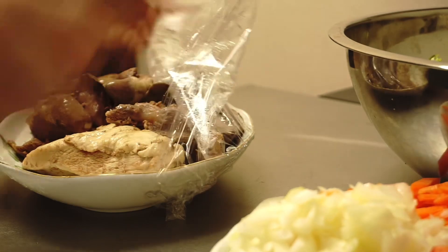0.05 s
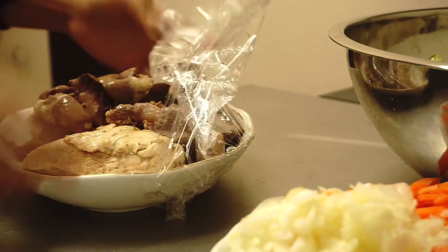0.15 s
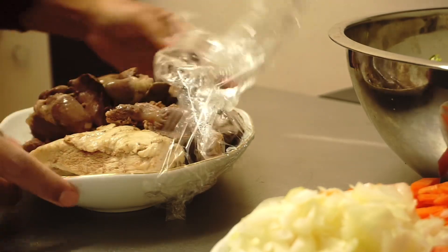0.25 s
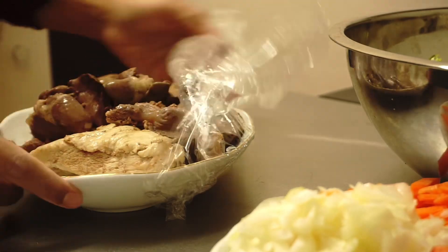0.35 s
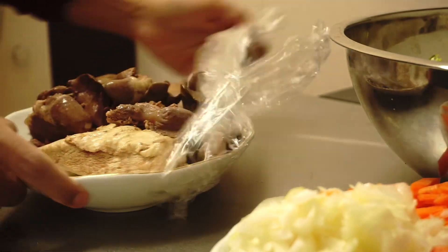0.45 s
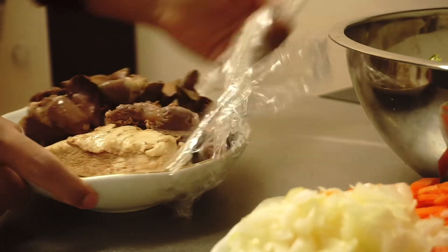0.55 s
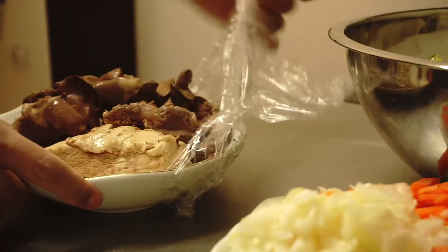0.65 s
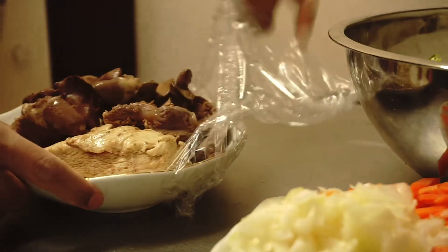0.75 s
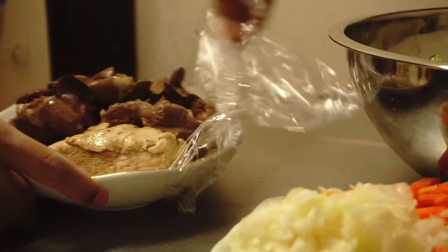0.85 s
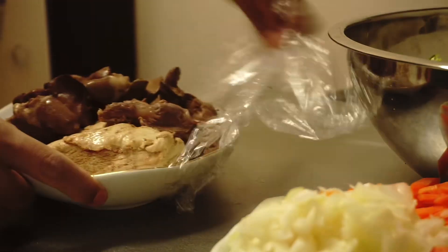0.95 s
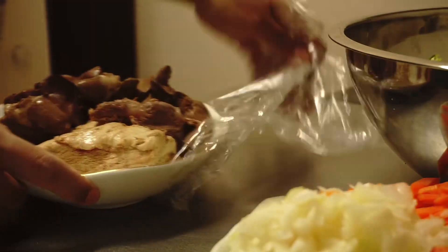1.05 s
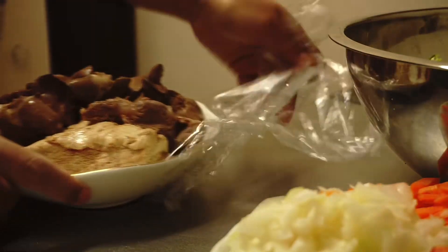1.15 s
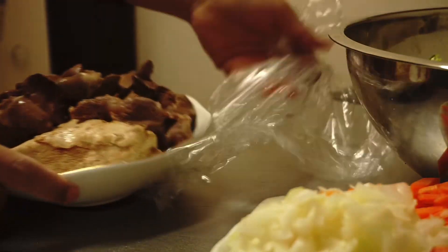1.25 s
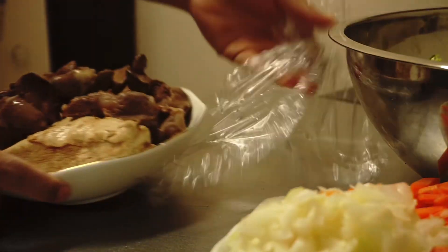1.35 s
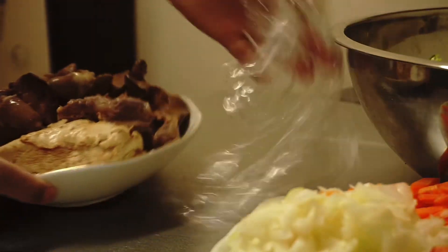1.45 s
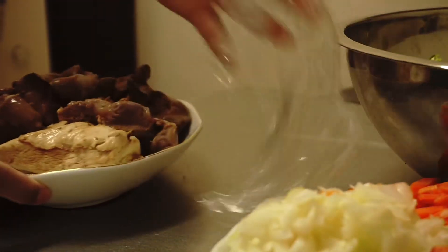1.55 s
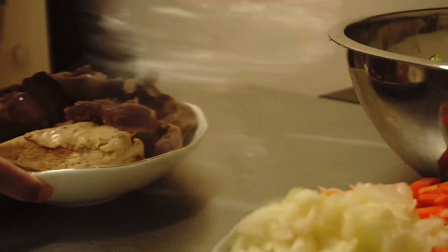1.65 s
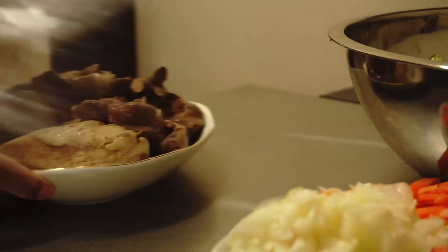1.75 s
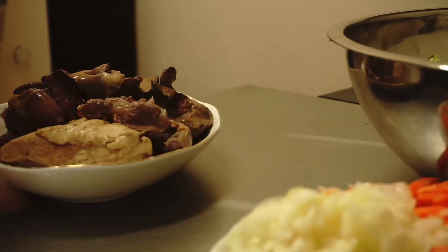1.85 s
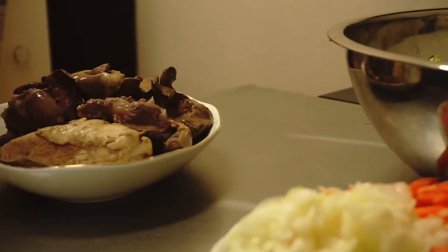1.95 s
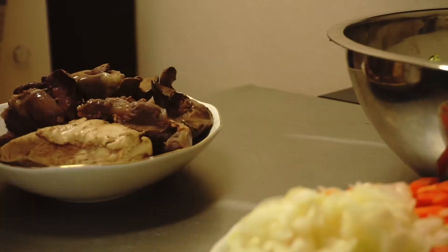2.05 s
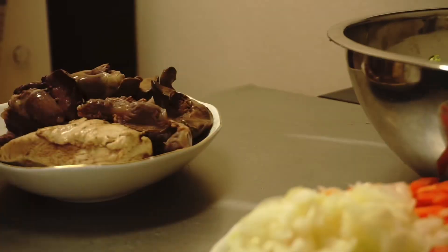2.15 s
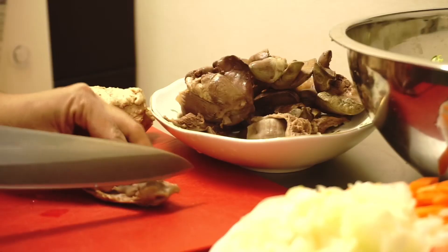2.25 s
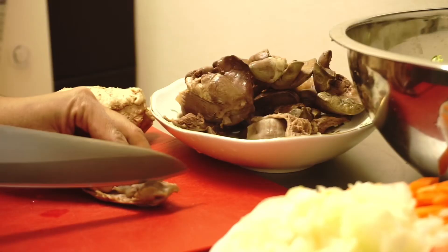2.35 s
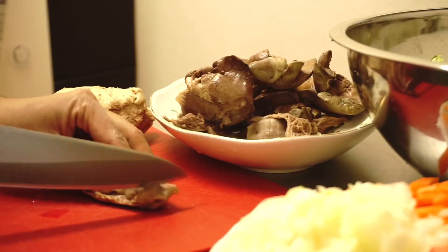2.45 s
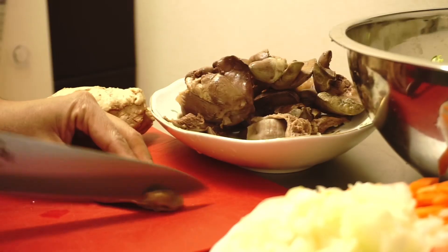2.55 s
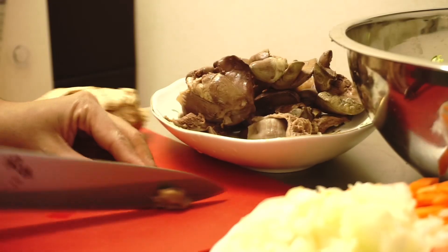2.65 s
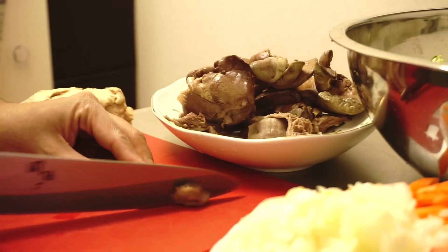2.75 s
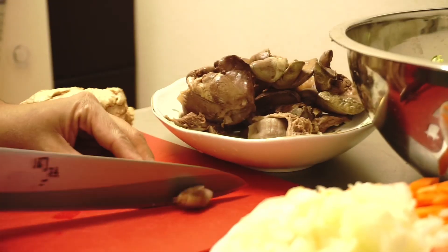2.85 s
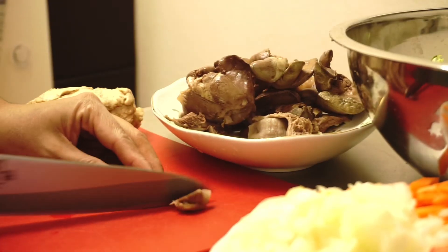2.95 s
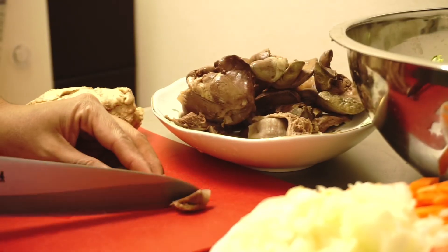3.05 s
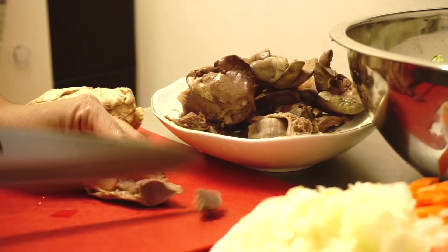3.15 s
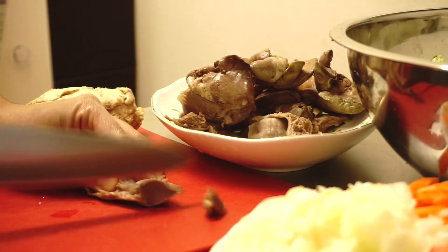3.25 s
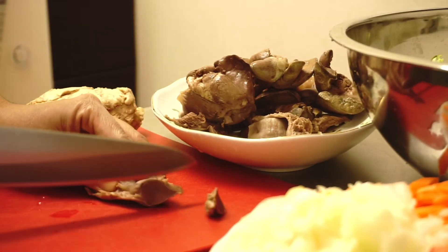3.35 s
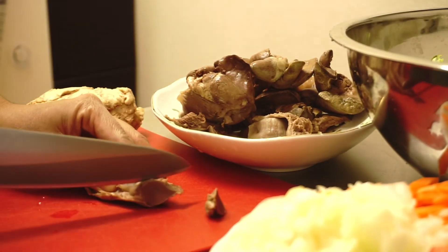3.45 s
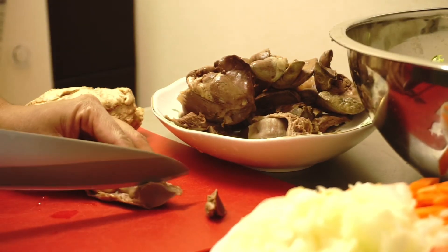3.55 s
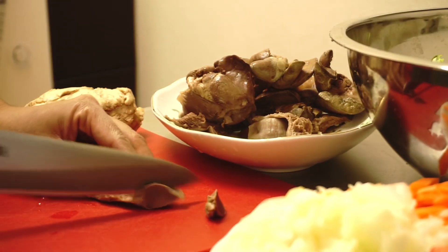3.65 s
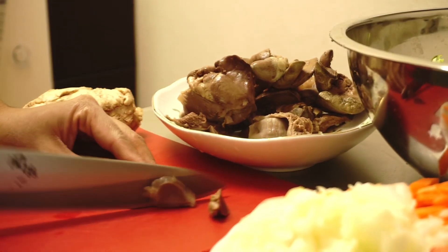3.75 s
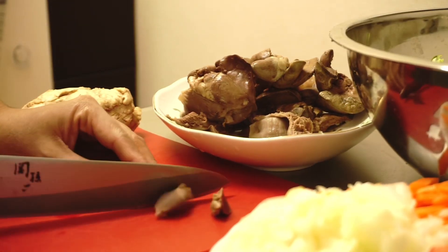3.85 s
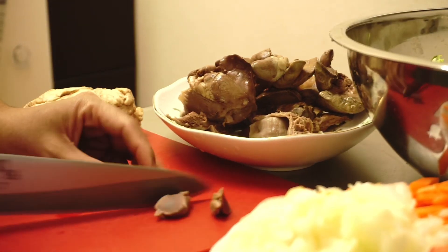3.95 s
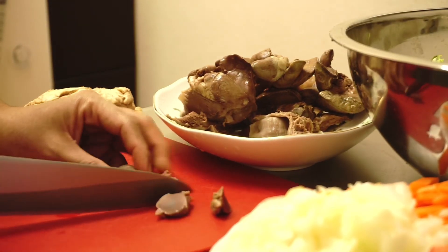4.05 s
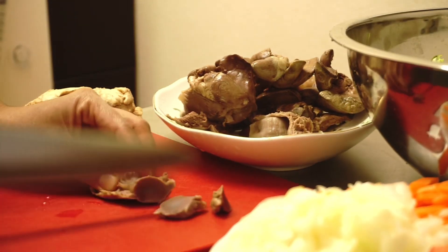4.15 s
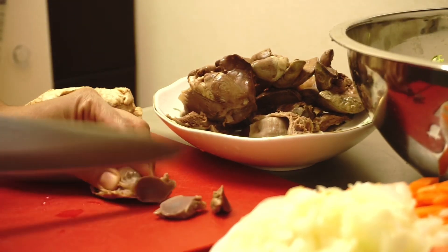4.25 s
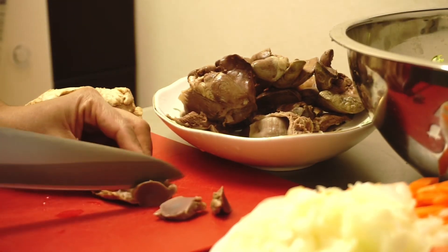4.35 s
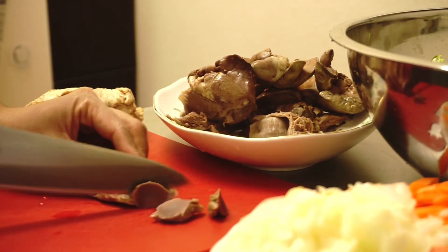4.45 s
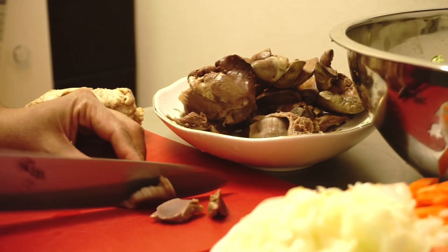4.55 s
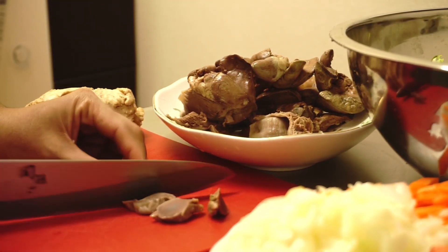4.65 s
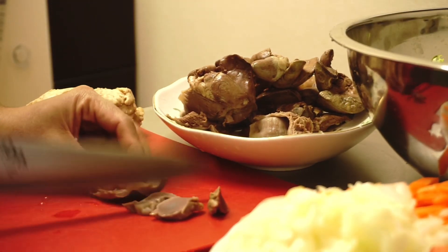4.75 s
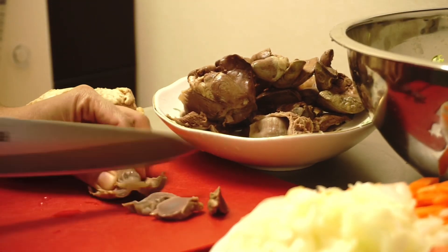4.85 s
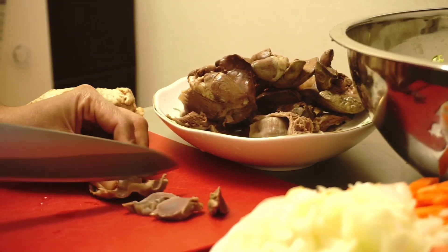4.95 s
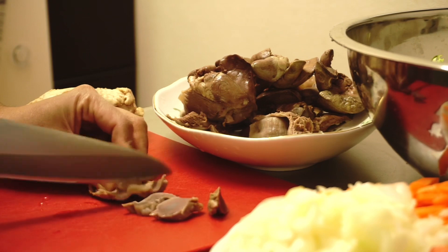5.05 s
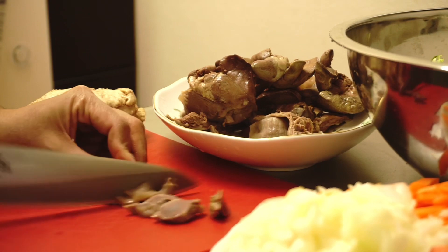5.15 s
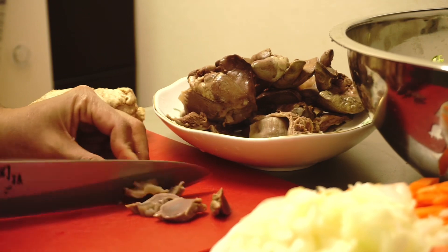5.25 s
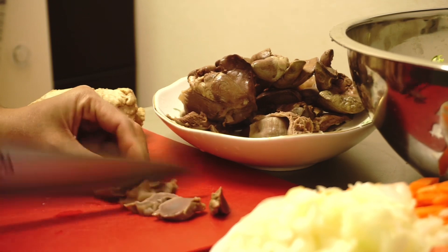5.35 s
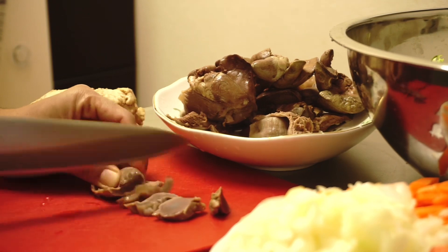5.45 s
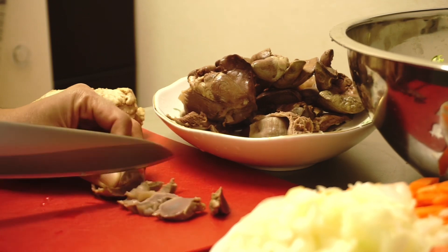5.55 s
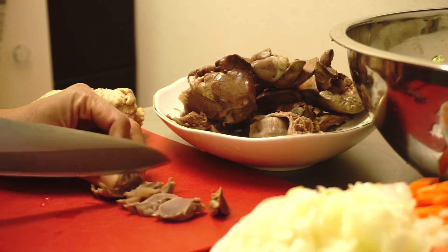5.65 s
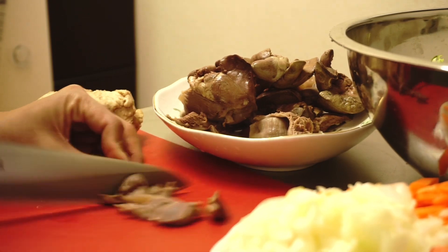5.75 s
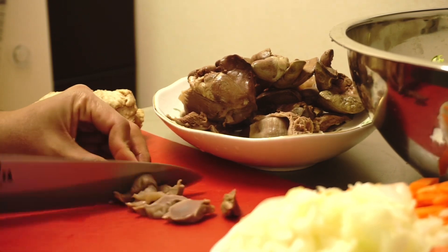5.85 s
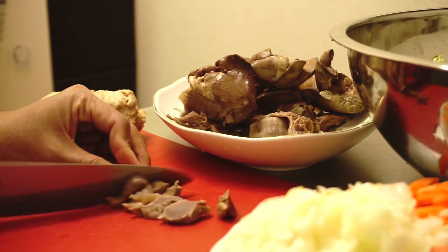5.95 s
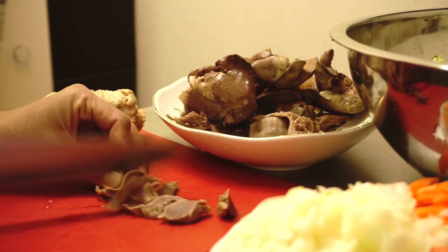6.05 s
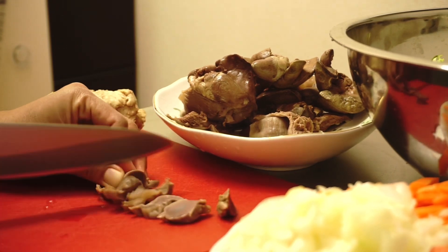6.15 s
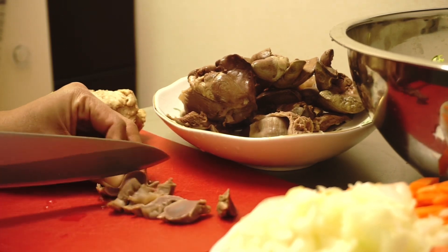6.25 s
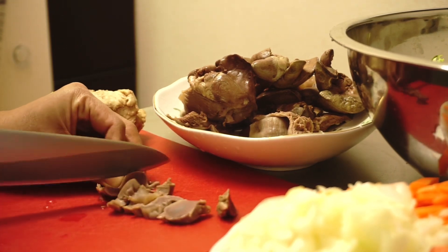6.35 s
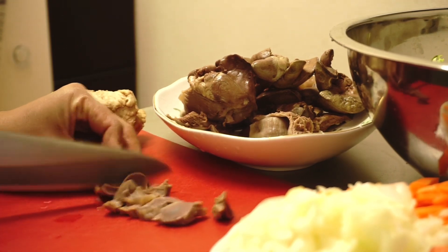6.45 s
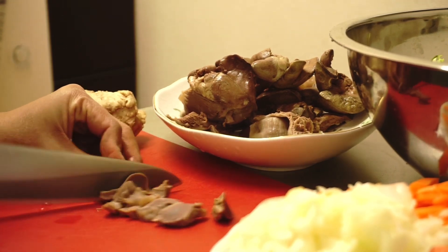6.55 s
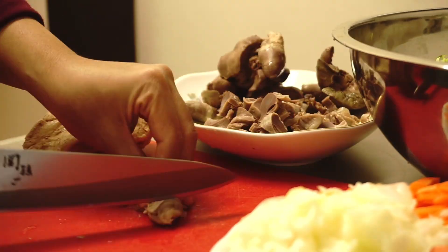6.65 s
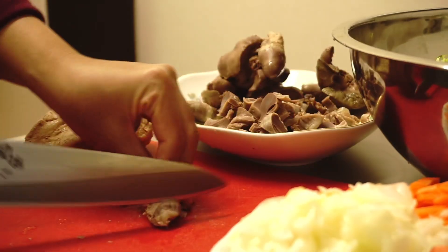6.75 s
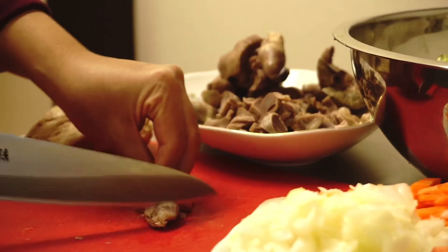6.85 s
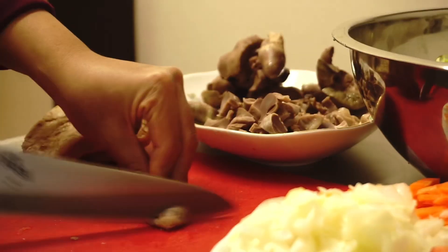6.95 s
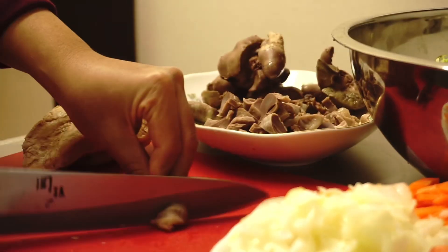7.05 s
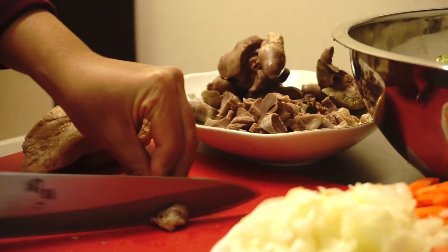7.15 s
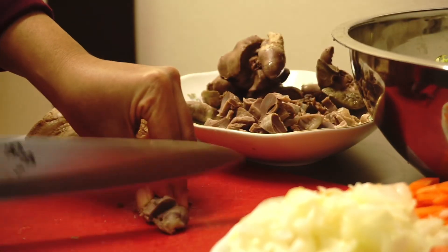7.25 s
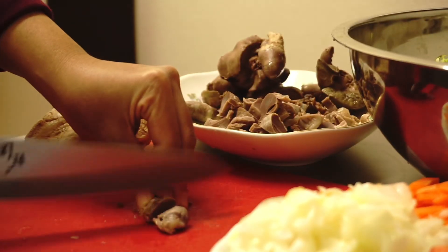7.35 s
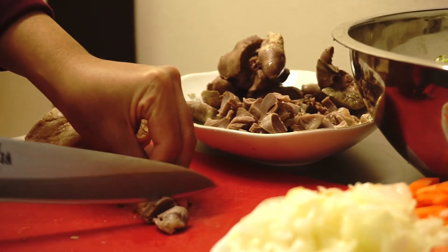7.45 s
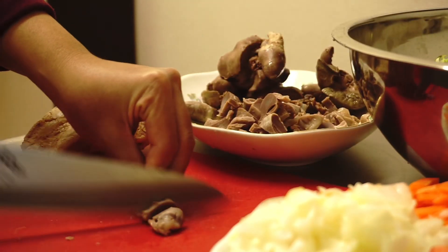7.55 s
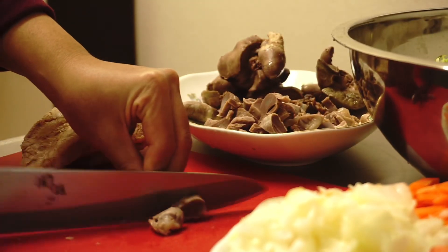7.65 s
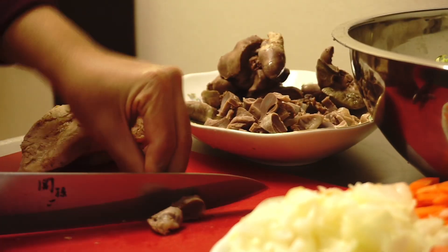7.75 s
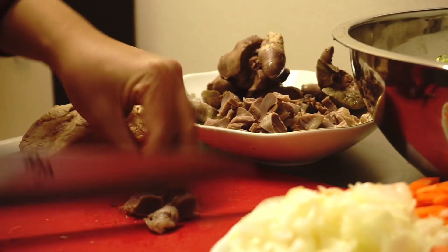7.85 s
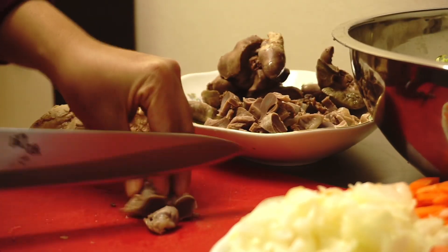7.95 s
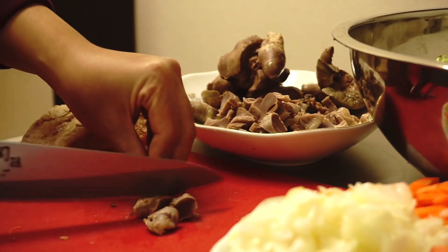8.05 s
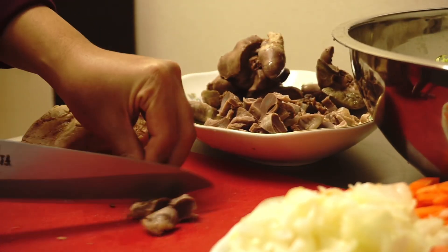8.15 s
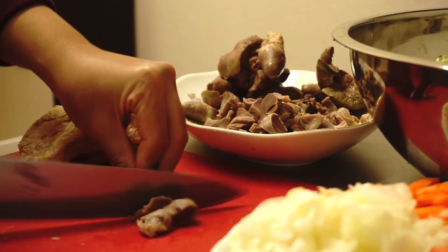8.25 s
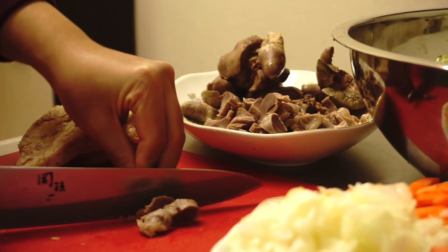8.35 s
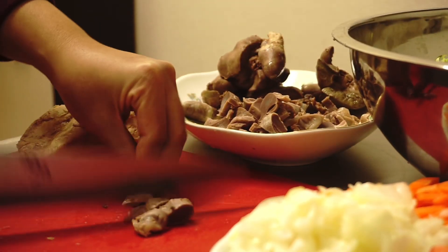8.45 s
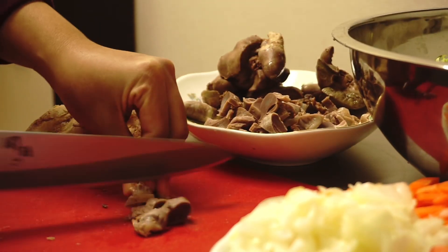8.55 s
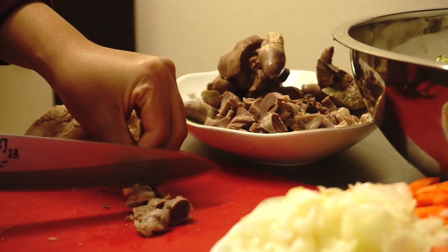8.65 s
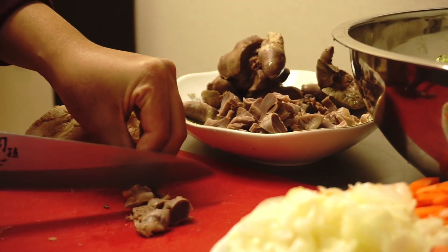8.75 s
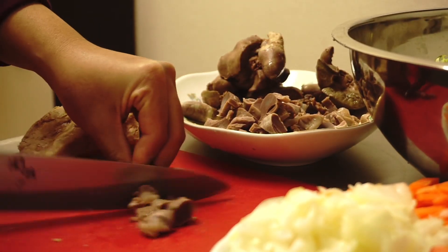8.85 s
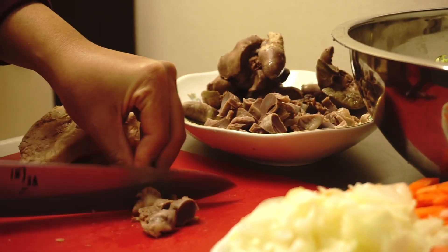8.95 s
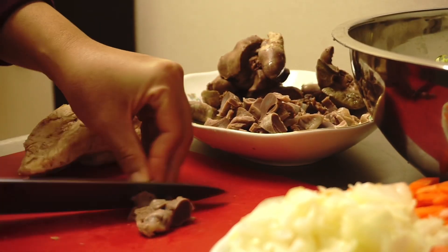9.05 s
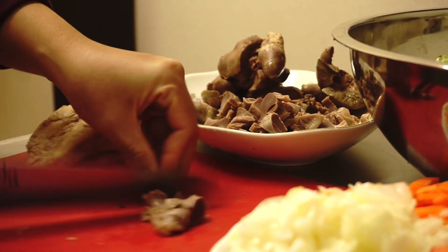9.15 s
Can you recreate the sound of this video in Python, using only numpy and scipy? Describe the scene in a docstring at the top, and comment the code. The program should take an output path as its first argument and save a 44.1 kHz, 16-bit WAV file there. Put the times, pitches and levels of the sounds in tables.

```python
"""A large knife slices cooked meat: each cut lands on a plastic board, which shakes the counter.
The landings are short pushes, filtered clacks and decaying modes; the dragged blade ticks and sings.
Before that, cling film is peeled off a china bowl and crumpled as filtered random clicks; the china rings,
the bowl bumps the counter, and the film stops dead at an edit. A small, live kitchen with a faint hum."""
import sys
import numpy as np
from scipy import signal
from scipy.fft import rfft, irfft, next_fast_len
from scipy.io import wavfile
from scipy.ndimage import uniform_filter1d

SR = 44100
rng = np.random.default_rng(int(sys.argv[2]) if len(sys.argv) > 2 else 0)


def output_pcm(signal):
    """Save a mono or channel-first signal as 16-bit PCM at the path in sys.argv[1].

    Samples are clipped to [-1, 1] before scaling.
    """
    pcm = np.clip(np.atleast_2d(signal).T, -1, 1) * 32767
    wavfile.write(sys.argv[1], SR, np.round(pcm).astype(np.int16))


N = 405260
T = np.arange(N) / SR
TAIL = T[:SR // 2]  # time axis of every ring and echo
EDIT_S, TOP_HZ = 2.249, 11170

# Blows: first the bowl on the counter, then the knife on the board. Each row: time in seconds, force in dB,
# cushioning by meat 0-1, weight on the edge 0-1, hiss of slicing in dB.
BLOWS = [(1.631, -29, 0.3, 0.87, -70), (2.557, -46, .55, 0.2, -75), (2.628, -35, 0.37, 0, -48.5),
         (2.9, -42, .65, 1, -48), (3.705, -34.5, 0.54, 0.44, -57.5), (3.942, -36, 0.88, 0.89, -50),
         (4.468, -24.5, 0.36, 0.07, -57.5), (5.105, -25.5, .2, 0, -57.5), (5.729, -24.5, 0.36, 0.43, -55),
         (5.795, -35.5, .7, 0.99, -74), (6.541, -40, 0.8, 0.14, -57.5), (6.92, -33.5, 0.48, 0.79, -55),
         (7.54, -25.5, 0.48, 0.33, -59), (8.202, -25, .02, 0.31, -59.5), (8.809, -37, 0.88, 0.52, -69),
         (8.98, -35.5, 1, 0, -57)]
# Low modes of the board, woken by every blow. Each row: frequency in Hz, level in dB, T60 in seconds.
BOARD_MODES = [(332.6, -1, 0.38), (360, 1, 0.43), (366, 4, 0.19), (430, 5, 0.32), (432, -30, 0.094),
               (517.4, 3.5, 0.28), (558.8, 2.5, 0.21), (591, -11, 0.47), (714, -31, 0.15)]
# Upper modes of the board, weaker on cushioned landings. Each row: frequency in Hz, level in dB, T60 in seconds.
BOARD_TOP_MODES = [(901, -6, 0.46), (1040, -5.5, 0.63), (1257, -14, 0.47), (1237, -8.5, 0.64),
                   (1316, 0.5, 0.3), (1598, -14.5, 0.49), (1673, -6.5, 0.22), (1900, -15, 0.12),
                   (2280, -7, 0.14)]
# Modes of the counter. Each row: frequency in Hz, level in dB, T60 in seconds.
COUNTER_MODES = [(122.6, -14.5, 0.81), (150, -13, 0.71), (183, -30, 0.18), (224.8, 3.5, 0.3),
                 (242, 7, 0.54), (280, 1, 0.57)]
# Spectrum of the edge's clack. Each row: frequency in Hz, relative level in dB.
CLACK_COLOUR = [(300, -26), (650, -10), (1050, 1), (1350, 0.5), (1700, 1.5), (2100, -8), (2500, -6.5),
                (3200, -11.5), (4500, -21.5), (9000, -28)]
# Spectrum of crushed fibres. Each row: frequency in Hz, relative level in dB.
CRUNCH_COLOUR = [(400, -22.5), (1500, 7.5), (3000, 10.5), (4500, 4), (7000, 0), (11000, 3.5)]
# Blade dragged clear over the board. Each row: peak in seconds, level in dB, length in seconds,
# pitch of the steel in Hz.
DRAGS = [(2.92, -71, 0.032, 2780), (3.015, -37, 0.025, 2830), (3.043, -35.5, 0.038, 3050),
         (4.057, -33, 0.025, 2063), (4.689, -38.5, 0.034, 2384), (5.306, -37, 0.027, 2024),
         (5.947, -39.5, 0.039, 2400), (7.124, -48.5, 0.054, 2260), (8.141, -58.5, 0.043, 2320),
         (8.383, -49, .04, 2300), (9.084, -45.5, .05, 2310)]
# Spectrum of the scraping edge. Each row: frequency in Hz, relative level in dB.
DRAG_COLOUR = [(60, -48), (200, -9), (600, 4), (1200, 0), (1900, 4), (2500, 5.5), (2900, 8), (3400, 2),
               (4500, 0.5), (7000, -3.5), (11000, -0.5)]
# Modes of the blade. Each row: ratio to the pitch of the steel, level in dB, T60 in seconds.
BLADE_MODES = [(1.001, -2, 0.26), (1.012, -19, 0.66), (1.049, -7, 0.23), (1.376, 1, 0.082),
               (1.439, -0.5, 0.067), (1.59, -5, 0.12), (2.44, -12, 0.13), (3.35, -29, .1)]
# Light knock of the knife. Each row: frequency in Hz, level in dB, T60 in seconds.
TAP_MODES = [(587, 0, 0.032), (806, -4, .03), (987, 5.5, 0.025), (1230, -2, 0.023), (1460, 2.5, 0.023),
             (1770, -2, .02), (2140, -1, 0.027), (2460, 1.5, 0.02), (3560, -8, .015)]
# Pulling and crumpling of the film. Each row: time in seconds, crackle level in dB before FILM_GAIN_DB.
FILM_EFFORT = [(0.0, -42.5), (0.14, -55), (0.31, -34.5), (0.39, -41), (0.5, -27), (0.54, -38),
               (0.76, -40.5), (0.79, -37.5), (0.84, -38.5), (0.91, -25), (1.06, -46.5), (1.12, -35.5),
               (1.31, -41.5), (1.4, -36), (1.44, -38.5), (1.46, -29), (1.58, -45), (1.64, -35.5),
               (1.83, -44.5), (2.16, -42.5), (2.21, -31), (2.25, -44)]
# Spectrum of the film. Each row: frequency in Hz, relative level in dB.
FILM_COLOUR = [(50, -32), (110, -25.5), (190, -17), (250, -14.5), (350, -5.5), (550, -8.5), (900, -7.5),
               (1300, -7.5), (2000, -3), (3000, -4.5), (4500, -4.5), (7000, -1.5), (11000, 2.5)]
# Loudest folds that snap loose. Each row: time in seconds, level in dB.
SNAPS = [(0.44, -37), (0.468, -25.5), (0.497, -30), (0.572, -27.5), (0.692, -26), (0.785, -24.5),
         (0.808, -26), (0.879, -21), (0.89, -23.5), (0.941, -22), (1.111, -36), (1.217, -32.5),
         (1.385, -26.5), (1.755, -34.5)]
# Film catching on china: rim, then dish. Each row: time in seconds, level in dB, build-up time in seconds.
PLUCKS = [(1.462, 2.5, 0.0094), (1.813, -13.5, 0.0024)]
# Modes of the bowl's rim. Each row: frequency in Hz, level in dB, T60 in seconds.
RIM_MODES = [(1263, -11, 0.35), (1878, 2.5, 0.18), (1884, -14.5, 0.54), (3060, -10, 0.21),
             (3900, -20, 0.29), (4640, -7, 0.15), (4760, -5, 0.11)]
# Modes of the grazed dish. Each row: frequency in Hz, level in dB, T60 in seconds.
DISH_MODES = [(1230, -4, 0.21), (2030, 0.5, 0.39), (2990, 4.5, 0.18), (4075, -13, 0.33), (5130, -4, 0.18)]
# Spectrum of the still air. Each row: frequency in Hz, relative level in dB.
AIR_COLOUR = [(40, -60), (85, -13.5), (125, -5.5), (160, -21), (240, 0), (330, 1.5), (480, -12), (780, -2),
              (1100, -10), (1500, -6), (1900, -16), (2400, -9), (3000, -12.5), (11000, -13.5)]
# Faint rush that comes and goes. Each row: time in seconds, level in dB.
RUSH_LEVEL = [(2.3, -72.5), (2.8, -59), (4.3, -59), (4.9, -64.5), (6.3, -65.5), (8.0, -63.5), (8.55, -58.5),
              (9.19, -53)]
# Spectrum of the rush. Each row: frequency in Hz, relative level in dB.
RUSH_COLOUR = [(70, -34.5), (130, -3.5), (250, 5), (400, 6.5), (500, 5), (620, 3), (900, -0.5), (1200, -6),
               (1900, -3), (2250, 1), (2700, -14), (8000, -16.5)]
# Reverberation of the kitchen. Each row: frequency in Hz, T60 in seconds.
ROOM_T60 = [(100, 0.48), (400, 0.54), (1500, 0.44), (4000, 0.42), (11000, 0.33)]
# Balance of the microphones. Each row: frequency in Hz, left minus right in dB.
LEFT_LEAD = [(100, 0.1), (350, 0.7), (620, 1.6), (1200, 2.5), (3600, 3), (10000, 5)]

# clack of a bare edge relative to the force; its change with full cushioning
CLACK_DB, CUSHION_DB = 29, -20.5
# relative to the force: (dB with no weight on the edge, dB added by full weight)
BOOM_DB, CRUNCH_DB, QUIVER_DB = (9, 12), (-17.5, 14), (-10.5, 36.5)
SLICE_LATE_S, SLICE_RISE_S, SLICE_FALL_S = 0.015, 0.05, 0.066  # hiss around each cut
DRAG_RISE_SHARE = 0.51  # share of a drag's length that goes into its rise
# singing of the steel: lead on the drag's peak, level at the reference drag, dB per dB of drag
SING_EARLY_S, SING_DB, SING_REFERENCE_DB, SING_SLOPE = 0.0079, -10, -35.5, 2.3
FILM_GAIN_DB, FILM_LEAD_S = 1.5, 0.0046  # creases buckle this much ahead of the pull
SNAP_RISE_S, SNAP_FALL_S = 0.00088, 0.0078
# low range of the crushed wad relative to the open sheet; centre and length of the change
WAD_DB, WAD_S, WADDING_S = -6, 1.84, 0.13


def amp(db):
    """Decibels to gain."""
    return 10 ** (np.asarray(db) / 20)


def along(points, hz):
    """Read (Hz, value) points on a log-frequency axis."""
    point_hz, value = np.transpose(points)
    return np.interp(np.log(hz + 1), np.log(point_hz), value)


def unit(x):
    """Scale to an rms of one."""
    return x / np.sqrt(np.mean(x ** 2))


def through(x, response):
    """Pass a sound through an impulse response, channel by channel."""
    return signal.fftconvolve(np.atleast_2d(x), np.atleast_2d(response), axes=1)[:, :N]


def butter(x, order, hz, kind):
    """Causal Butterworth filter."""
    return signal.sosfilt(signal.butter(order, hz, kind, fs=SR, output="sos"), x)


def top_cut(x):
    """Steep low-pass at the top of the recorder's range."""
    return signal.sosfilt(signal.ellip(12, .1, 80, TOP_HZ, fs=SR, output="sos"), x)


def colour(points, size=4096):
    """Minimum-phase response of unit energy with the given (Hz, dB) spectrum, cut at the top."""
    level_db = along(points, np.fft.rfftfreq(size, 1 / SR))
    cepstrum = irfft(np.log(amp(level_db)))
    # folding the cepstrum makes the response causal
    cepstrum[1:size // 2] *= 2
    cepstrum[size // 2 + 1:] = 0
    response = top_cut(irfft(np.exp(rfft(cepstrum))))
    return response / np.linalg.norm(response)


def ring(modes, spread_rad, build_s):
    """Stereo response of decaying modes that build up briefly and reach the two microphones out of step."""
    out = 0
    sides = np.array([[1], [-1]])
    for k, (hz, db, t60_s) in enumerate(modes):
        phase = rng.uniform(0, 2 * np.pi) + spread_rad * (-1) ** k * sides
        decay = np.exp(-np.log(1000) * TAIL / t60_s)
        out = out + amp(db) * np.sin(2 * np.pi * hz * TAIL + phase) * decay
    out = out * (1 - np.exp(-TAIL / build_s))
    return out / np.linalg.norm(out[0])


def diffuse(size, apart_hz=600):
    """Stereo white noise whose bass is largely shared by both microphones."""
    mid, side = rfft(rng.standard_normal((2, size)))
    hz = np.fft.rfftfreq(size, 1 / SR)
    angle = np.pi / 4 * (hz + 100) / np.hypot(hz + 100, apart_hz)
    return irfft(mid * np.cos(angle) + side * np.sin(angle) * np.array([[1], [-1]]), size)


def kitchen(x, wet_db, wall_s=0.0099, wall_db=3, wall_width_s=0.00067):
    """Direct sound plus dense decaying reflections, with a cluster from the far wall."""
    hz, s, field = signal.stft(diffuse(len(TAIL)), SR, nperseg=256)
    field = field * np.exp(-np.log(1000) * s / along(ROOM_T60, hz)[:, None])
    tail = signal.istft(field, SR)[1][:, :len(TAIL)]
    onset = 1 - np.exp(-TAIL / 0.00022)
    wall = amp(wall_db * np.exp(-((TAIL - wall_s) / wall_width_s) ** 2))
    tail = tail * onset * wall
    reflected = through(x, tail / np.linalg.norm(tail[0]))
    return (x + amp(wet_db) * reflected) / np.hypot(1, amp(wet_db))


def crackle(per_s, scatter_db):
    """Random clicks of unit rms, mostly small with a few large ones."""
    sizes = amp(scatter_db * np.minimum(rng.exponential(size=N), 4))
    hits = rng.random(N) < per_s / SR
    return unit(hits * sizes * rng.choice([-1, 1], N))


def swell(s, rise_s, fall_s):
    """Bell-shaped envelope of a stroke that peaks at s; rise and fall are its 1/e widths."""
    out = np.zeros(N)
    near = slice(max(int(s * SR) - SR // 4, 0), int(s * SR) + SR // 4)
    t = T[near] - s
    out[near] = np.exp(-(np.abs(t) / np.where(t < 0, rise_s, fall_s)) ** 2.07)
    return out


def add(out, s, sound):
    """Mix a short sound into out, starting at s."""
    start = int(s * SR)
    out[:, start:start + sound.shape[-1]] += sound[..., :N - start]


def struck(modes, damping, spot_db=0.5):
    """Every spot struck favours other modes (random levels); meat under the blade shortens them."""
    return [(hz, db + spot_db * rng.standard_normal(), t60_s / damping) for hz, db, t60_s in modes]


def weighted(rule_db, weight):
    """Level of one part of a blow, given the weight on the edge."""
    return rule_db[0] + rule_db[1] * weight


def push(width_s):
    """Curvature of a short bell-shaped push, which is what the board radiates."""
    u = TAIL / width_s - 5
    return (1 - u ** 2) * np.exp(-u ** 2 / 2)


def squeeze(size=SR // 10):
    """Fibres give way ever faster before a landing and patter on the board: rising band noise."""
    patter = unit(butter(rng.standard_normal(size), 3, [300, 900], "bandpass"))
    return patter * np.exp(-TAIL[:size] / 0.0056)[::-1]


def blows(contact_s=0.00041, land_s=.003, meat_damping=0.93, meat_softening=0.26, squeeze_db=-13,
          slap_db=10.5, meat_slap_db=4, board_db=29, top_db=-5.0, tick_db=25):
    """The edge squeezes through the meat and lands: a slap, a hard clack, then board and counter ring on."""
    ringing, slaps, edge, fibres = np.zeros((2, N)), np.zeros((1, N)), np.zeros((1, N)), 0
    clack, tick = colour(CLACK_COLOUR), colour(CRUNCH_COLOUR)
    for blow_s, force_db, cushion, weight, _ in BLOWS:
        s = blow_s + land_s
        # meat under the edge dulls the clack, lengthens the push and damps board and counter
        clack_db = force_db + CLACK_DB + CUSHION_DB * cushion
        damping = 1 + meat_damping * cushion
        width_s = contact_s * (1 + meat_softening * cushion)
        # weight on the edge crushes fibres and reaches down into the counter
        boom_db = force_db + weighted(BOOM_DB, weight)
        crunch_db = force_db + weighted(CRUNCH_DB, weight)

        add(slaps, s - 4 * width_s, amp(force_db + slap_db + meat_slap_db * cushion) * push(width_s))
        add(slaps, s - .1, amp(force_db + squeeze_db) * squeeze())
        add(edge, s, amp(clack_db) * clack + amp(crunch_db + tick_db) * tick)
        fibres = fibres + amp(crunch_db) * swell(s, 0.003, 0.0042)

        counter = ring(struck(COUNTER_MODES, damping), spread_rad=0.32, build_s=0.006)
        board = ring(struck(BOARD_MODES, damping), spread_rad=0.54, build_s=0.012)
        board_top = ring(struck(BOARD_TOP_MODES, damping), spread_rad=0.74, build_s=0.0012)
        add(ringing, s, amp(boom_db) * counter)
        add(ringing, s, amp(force_db + board_db) * board)
        add(ringing, s, amp(clack_db + top_db) * board_top)
    crunch = amp(3.0) * through(fibres * crackle(per_s=5000, scatter_db=3.5), tick)
    # the board is too small to radiate the deepest part of its slap
    slaps = butter(slaps, 1, 140, "highpass")
    slaps = kitchen(slaps, wet_db=0.5, wall_s=0.0218, wall_db=9.5, wall_width_s=0.0019)
    return ringing + slaps + kitchen(edge + crunch, wet_db=7.0)


def drags():
    """The edge sticks and slips in dense ticks: through the meat at each cut, then over the board."""
    slicing = sum(amp(db) * swell(s + SLICE_LATE_S, SLICE_RISE_S, SLICE_FALL_S) for s, *_, db in BLOWS)
    scraping = 0
    for s, db, length_s, _ in DRAGS:
        rise_s, fall_s = DRAG_RISE_SHARE * length_s, (1 - DRAG_RISE_SHARE) * length_s
        scraping = scraping + amp(db) * swell(s, rise_s, fall_s)
    ticks = (slicing + scraping) * crackle(per_s=7000, scatter_db=3.5)
    return kitchen(through(ticks, colour(DRAG_COLOUR)), wet_db=-4)


def steel(bend_hz=598, bend_t60_s=0.87):
    """The blade's slow bending note, louder after weighty blows, and its high ring around each drag."""
    out = np.zeros((2, N))
    for s, force_db, _, weight, _ in BLOWS:
        if s > EDIT_S:  # knife only, not the bowl
            bend = ring([(bend_hz, 0, bend_t60_s)], spread_rad=0.67, build_s=0.005)
            add(out, s, amp(force_db + weighted(QUIVER_DB, weight)) * bend)
    for s, db, _, pitch_hz in DRAGS:
        modes = [(pitch_hz * ratio, mode_db, t60_s) for ratio, mode_db, t60_s in BLADE_MODES]
        sing_db = SING_DB + SING_SLOPE * (db - SING_REFERENCE_DB)
        add(out, s - SING_EARLY_S, amp(sing_db) * ring(modes, spread_rad=0.39, build_s=0.0036))
    return out


def tap(s=6.0135, db=-8):
    """One light, dry knock of the knife between cuts: fast-decaying modes."""
    out = np.zeros((2, N))
    add(out, s, amp(db) * ring(TAP_MODES, spread_rad=.3, build_s=0.00031))
    return kitchen(out, wet_db=-3)


def film(clump_db=2.5):
    """Countless tiny creases buckle all over the sheet; whole folds let go in brief bursts."""
    effort = amp(np.interp(T + FILM_LEAD_S, *np.transpose(FILM_EFFORT)) + FILM_GAIN_DB)
    snaps = sum(amp(db) * swell(s, SNAP_RISE_S, SNAP_FALL_S) for s, db in SNAPS)
    creases = 0
    # each part of the sheet reaches the two microphones up to two samples apart
    for lag in (-2, 0, 1):
        # crackle swells and thins in clumps of a few milliseconds
        clumps = amp(clump_db * unit(uniform_filter1d(rng.standard_normal(N), size=200)))
        small = effort * clumps * crackle(per_s=750, scatter_db=2.0)
        part = small + snaps * crackle(per_s=4000, scatter_db=1.0)
        creases = creases + np.array([part, np.roll(part, lag)]) / np.sqrt(3)
    sheet = through(creases, colour(FILM_COLOUR))
    # a taut, wide sheet radiates more of the low range than a crumpled wad
    body = signal.sosfiltfilt(signal.butter(2, 3200, fs=SR, output="sos"), sheet)
    wadded = np.clip((T - WAD_S) / WADDING_S + .5, 0, 1)
    return kitchen(sheet + body * (amp(WAD_DB * wadded) - 1), wet_db=1.0)


def bowl():
    """The clinging film slips off the rim, then grazes a dish, and sets each ringing."""
    out = np.zeros((2, N))
    for (s, db, build_s), modes in zip(PLUCKS, (RIM_MODES, DISH_MODES)):
        add(out, s, amp(db) * ring(modes, spread_rad=0.44, build_s=build_s))
    return out


def background(air_db=-63.5, hum_hz=121, hum_db=-83):
    """Still room air and a faint rush, both filtered noise, and a low appliance hum, a sine."""
    air = amp(air_db) * through(diffuse(N, apart_hz=600), colour(AIR_COLOUR))
    rush_gain = amp(np.interp(T, *np.transpose(RUSH_LEVEL)))
    rush = rush_gain * through(diffuse(N, apart_hz=685), colour(RUSH_COLOUR))
    hum = amp(hum_db) * unit(np.sin(2 * np.pi * hum_hz * T))
    return air + rush + hum


def scene():
    """The unwrapping stops dead at the edit; the chopping follows in the same room."""
    before_edit = np.clip((EDIT_S - T) / .002, 0, 1)
    knife = blows() + drags() + steel() + tap()
    unwrapping = (film() + bowl()) * before_edit
    return knife + unwrapping + background()


def record(dry, rumble_hz=60, left_late_s=.00002):
    """The left microphone picks up more treble, a touch later; the recorder cuts rumble and the top."""
    size = next_fast_len(N + 4096)
    hz = np.fft.rfftfreq(size, 1 / SR)
    lead_db = along(LEFT_LEAD, hz)
    left = amp(lead_db / 2) * np.exp(-2j * np.pi * hz * left_late_s)
    right = amp(-lead_db / 2)
    picked_up = irfft(rfft(dry, size) * np.array([left, right]), size)[:, :N]
    return top_cut(butter(picked_up, 2, rumble_hz, "highpass"))


dry = scene()
out = record(dry)
output_pcm(out)
```